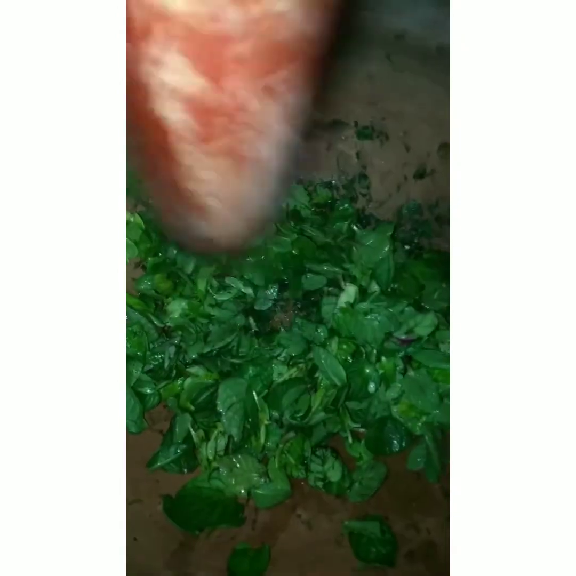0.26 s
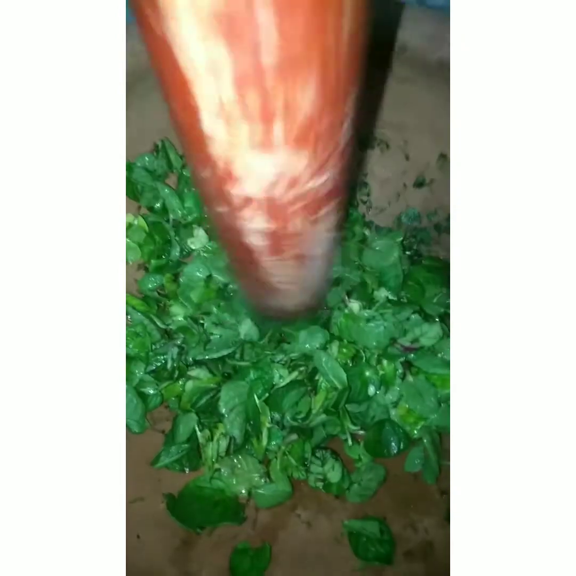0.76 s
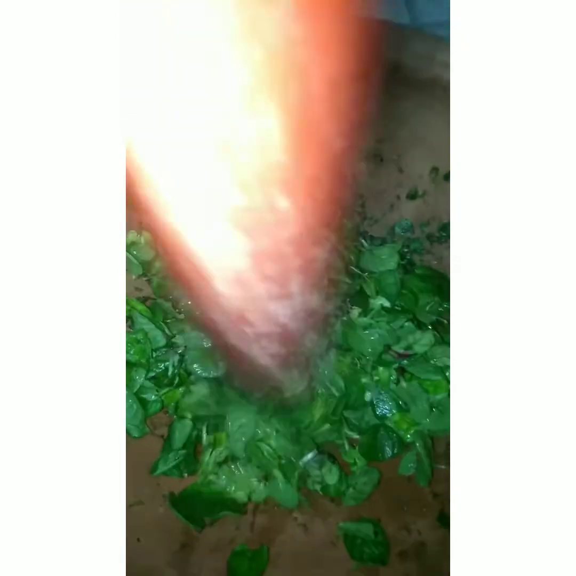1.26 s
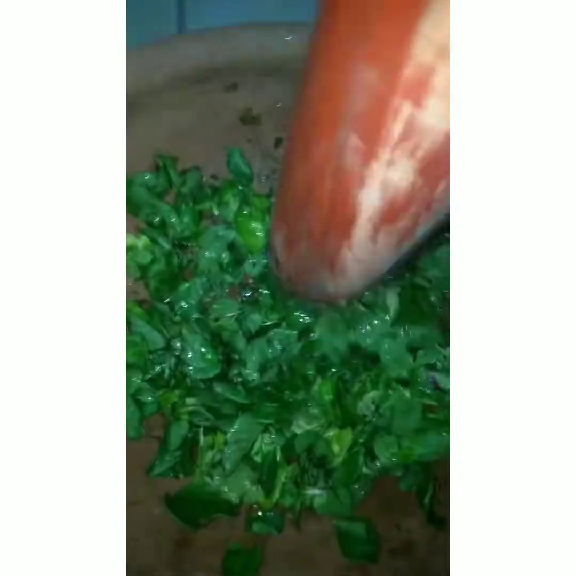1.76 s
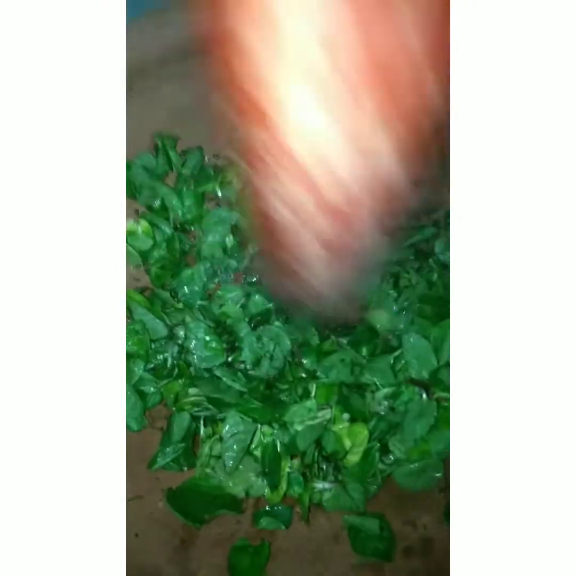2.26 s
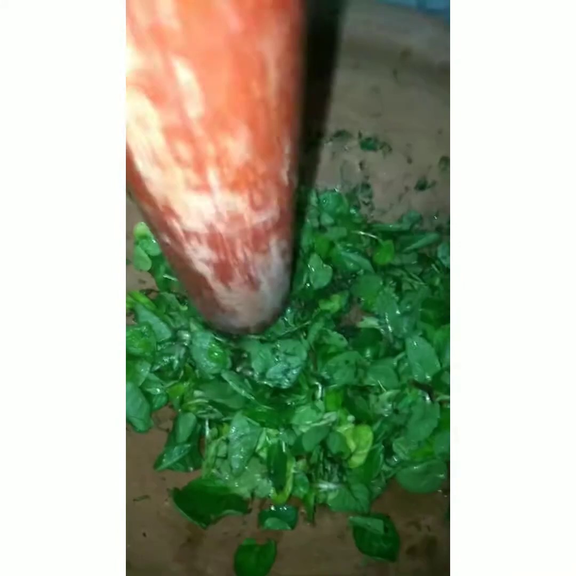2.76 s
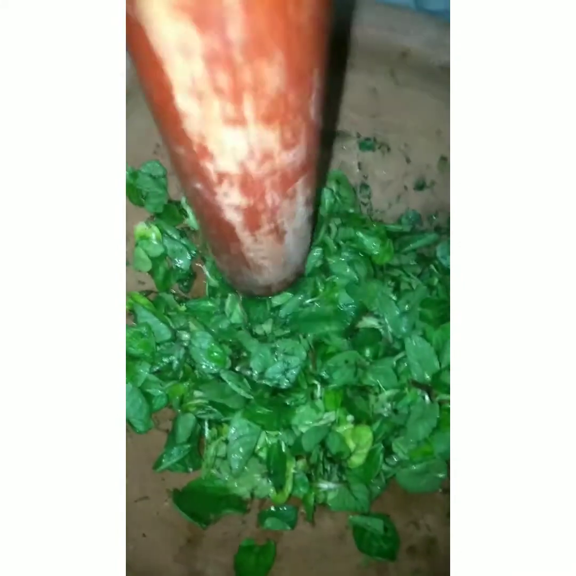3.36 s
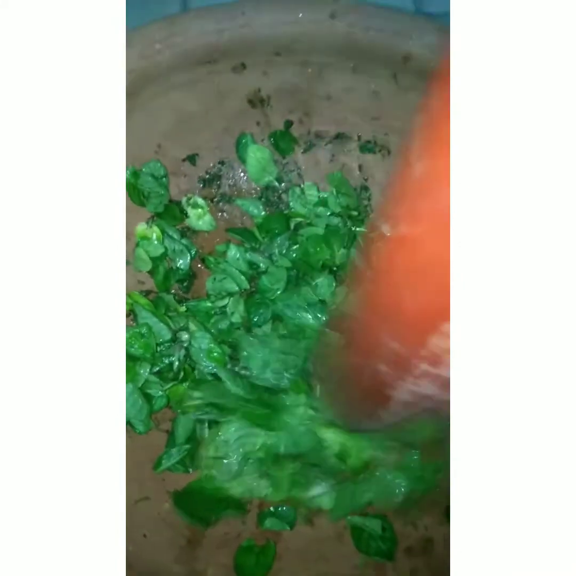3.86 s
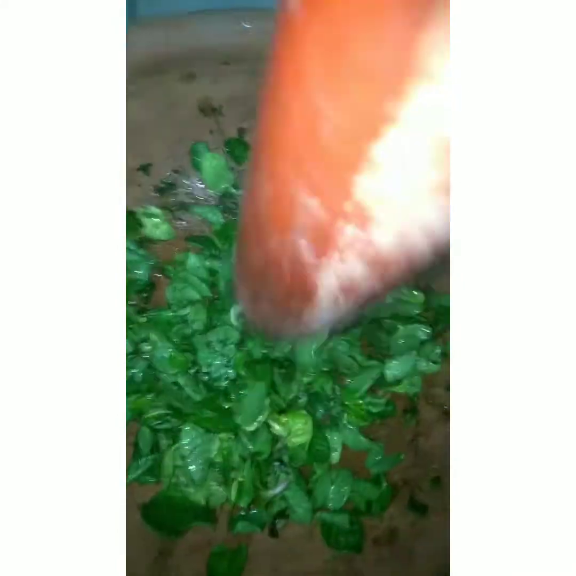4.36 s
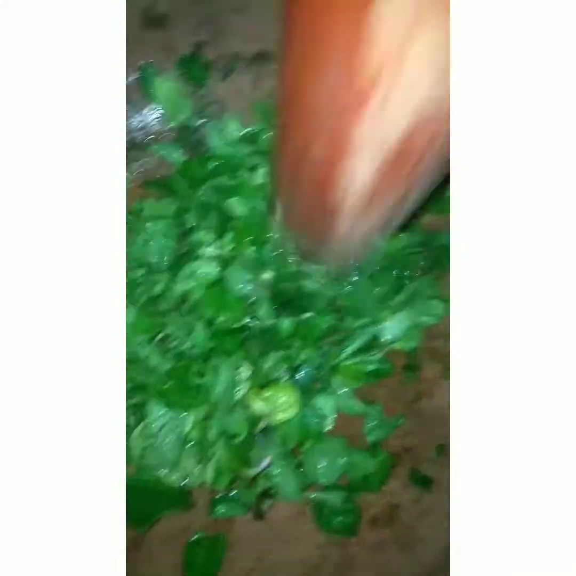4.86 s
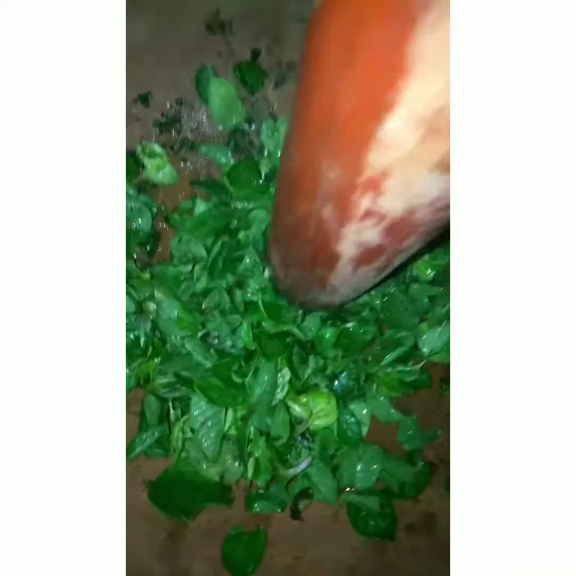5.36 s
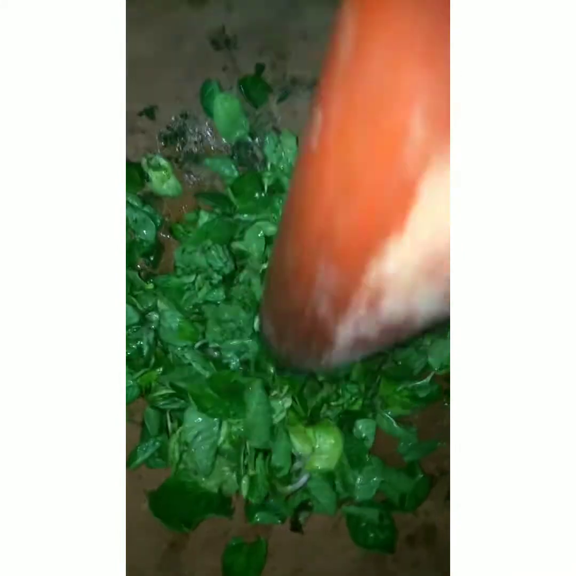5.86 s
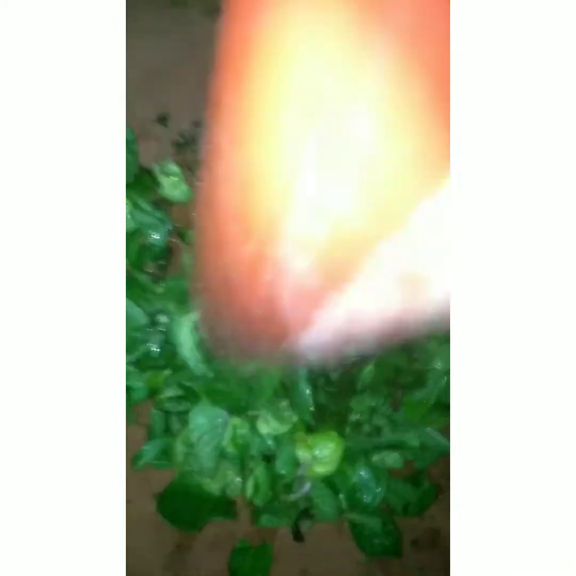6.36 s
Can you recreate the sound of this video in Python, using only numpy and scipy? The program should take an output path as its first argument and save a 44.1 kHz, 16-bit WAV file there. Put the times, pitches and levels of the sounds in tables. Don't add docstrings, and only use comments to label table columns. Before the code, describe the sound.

Steady pounding, over three strokes a second, of wood on leaves in a clay bowl: dull clonks, wet crackles, brief kitchen echo.

```python
import sys
import numpy as np
from scipy import signal
from scipy.fft import rfft, irfft, next_fast_len
from scipy.io import wavfile
from scipy.ndimage import uniform_filter1d

SR = 44100
rng = np.random.default_rng(int(sys.argv[2]) if len(sys.argv) > 2 else 0)


def persist_wave(psi):
    counts = np.round(np.clip(psi, -1, 1) * 32767).astype(np.int16)
    wavfile.write(sys.argv[1], SR, np.atleast_2d(counts).T)


def linear_from_db(decibels):
    return 10 ** (np.asarray(decibels, float) / 20)


N = 291501

# (time [s], bowl level [dB], floor thud level [dB], pestle level [dB], rim level [dB])
STRIKES = [(0.086, -13, -35, -26.5, -33), (0.372, -38.5, -37, -38, -44), (0.665, -30, -32, -39.5, -43),
           (0.968, -26.5, -33, -43, -40.5), (1.255, -39.5, -34, -39.5, -37.5),
           (1.545, -29, -33, -47, -38.5), (1.84, -30, -34, -31.5, -32.5), (2.132, -14, -36.5, -23.5, -32.5),
           (2.42, -17.5, -31, -27.5, -40), (2.721, -29.5, -32.5, -39.5, -48.5),
           (3.013, -14.5, -28.5, -66, -41), (3.292, -21.5, -30.5, -61, -33.5),
           (3.326, -20.5, -30, -55, -54), (3.595, -32, -36, -30, -38), (3.879, -14.5, -33.5, -39, -25),
           (4.169, -23.5, -32, -44, -28), (4.439, -34.5, -36.5, -41.5, -48), (4.728, -17, -35, -35.5, -47),
           (5.014, -14, -32, -32.5, -26.5), (5.297, -34.5, -35, -38, -43), (5.581, -25.5, -32.5, -40, -49),
           (5.869, -17, -34, -25.5, -23.5), (6.153, -12, -36.5, -29, -32.5), (6.44, -13, -37.5, -30.5, -31)]
# (time [s], crunch level [dB], coarse part level [dB],
# crackle afterwards level [dB], heap settling level [dB])
CRUSHES = [(0.0831, -18.5, -12, -48.5, -92), (0.3699, -24, -38.5, -56, -57.5), (0.6675, -20, -27, -42, -59),
           (0.9699, -17.5, -25, -40, -53.5), (1.2579, -23.5, -34, -51, -53), (1.5452, -21, -34, -40, -66.5),
           (1.8388, -19.5, -28, -39, -56), (2.1272, -20, -33, -47, -86), (2.4167, -21, -26.5, -48, -64),
           (2.7189, -23, -22.5, -51, -63), (3.0088, -18, -40.5, -41, -57), (3.2895, -21.5, -31, -37, -56.5),
           (3.5925, -20.5, -35, -44, -56), (3.877, -19, -14.5, -44, -66.5), (4.1673, -26.5, -23, -52, -63),
           (4.44, -27.5, -33, -55.5, -64), (4.7247, -20.5, -14.5, -38.5, -50.5),
           (5.013, -21, -10.5, -46, -63), (5.2963, -22.5, -37.5, -46, -62), (5.5784, -24, -30, -48, -52),
           (5.8681, -20, -22, -41.5, -68), (6.1516, -24.5, -25, -53, -74), (6.436, -26, -42, -53, -66)]
# (frequency [Hz], density [dB per Hz])
LEAF_SPECTRUM = [(1650, 0.5), (2800, 0.5), (3760, -6.5), (4210, -4), (5520, -10.5), (7750, 1.5),
                 (9720, -10.5), (11400, -10), (13400, -13), (15200, 1), (16200, -29), (16600, -61),
                 (17000, -67)]
# (frequency [Hz], density [dB per Hz])
SCRAPE_SPECTRUM = [(300, 3), (600, 7.5), (800, 18), (1300, 11), (2000, 7), (2500, -1.5), (3500, -35),
                   (5000, -20)]


def colour(x, points):
    size = next_fast_len(len(x))
    hz, db = np.transpose(points)
    log_hz = np.log(np.fft.rfftfreq(size, 1 / SR) + 1)
    gain = linear_from_db(np.interp(log_hz, np.log(hz), db, left=-90, right=-90))
    gain = gain / np.sqrt(np.mean(gain ** 2))
    return irfft(rfft(x, size) * gain, size)[:len(x)]


def add(out, s, x):
    i = int(s * SR)
    out[i:i + len(x)] += x[:len(out) - i]


def walk(rate):
    hold = int(SR / rate)
    steps = np.repeat(rng.standard_normal(N // hold + 1), hold)
    return 1.2 * uniform_filter1d(steps, hold)[:N]


def ring(modes, chance, swell_ms, detune=.005, scatter_db=2.0):
    t = np.arange(SR // 2) / SR
    hz, db, t60 = np.array(modes, float).T[:, :, None]
    count = len(hz)
    hz = hz * (1 + detune * chance[0, :count, None])
    gain = linear_from_db(db + scatter_db * chance[1, :count, None])
    decay = np.exp(-np.log(1000) * t / t60)
    waves = gain * decay * np.sin(2 * np.pi * hz * t)
    swell = (1 - np.exp(-t * 1000 / swell_ms)) ** 2
    return waves.sum(axis=0) * swell


def grains(per_s, spread_db):
    when, sign, size = rng.random((3, N))
    size_db = np.minimum(-spread_db * np.log(1 - size), 24)
    x = (when < per_s / SR) * np.sign(sign - .5) * linear_from_db(size_db)
    x = x / x.std() + .8 * rng.standard_normal(N)
    return x / x.std()


def clink():
    # (frequency [Hz], level [dB], t60 [s])
    dish = [(1070, -60.5, 0.31), (1160, -62, .2), (1690, -55, 0.19)]
    return ring(dish, np.zeros((2, 3)), swell_ms=0.088)


def air(loud):
    # (frequency [Hz], density [dB per Hz])
    hum_spectrum = [(12, -29), (20, 10.5), (70, 5.5), (237, 10.5), (401, -11), (561, 0.5), (677, -9),
                    (752, -46), (1170, -11), (2010, -20), (3000, -94), (3900, -63), (6600, -120)]
    keep = np.exp(-1 / (.25 * SR))
    recent = signal.lfilter([1 - keep], [1, -keep], loud ** 2)
    duck = 1 / (1 + recent / linear_from_db(-78.0)) ** 0.21
    wander = linear_from_db(3 * walk(5))
    return linear_from_db(-59.0) * wander * duck * colour(rng.standard_normal(N), hum_spectrum)


def stirring():
    # (start [s], build-up [s], hold [s], fine level [dB], coarse level [dB])
    drags = [(0.029, 0.016, 0.0068, -60.5, -53), (0.782, 0.11, 0.065, -64.5, -65.5),
             (1.165, 0.036, 0.046, -63, -61.5), (1.318, 0.034, 0.25, -61, -66),
             (1.752, 0.021, 0.072, -54.5, -51.5), (1.88, 0.081, 0.058, -64, -62),
             (2.8, 0.085, 0.12, -72, -72), (3.123, 0.071, 0.09, -69, -72), (3.34, 0.055, 0.024, -68, -83),
             (4.516, 0.094, 0.088, -59.5, -61), (5.09, 0.12, .06, -68.5, -69),
             (5.495, .08, 0.0089, -59, -62), (5.614, 0.072, 0.039, -58, -59.5),
             (6.047, 0.097, .01, -64, -64), (6.197, 0.042, 0.14, -71, -60), (6.514, 0.079, 0.054, -75, -81)]
    rest_db, rest_coarse_db = -76, -75.5
    settle_db_s, rock_db_s, stop_db_s = 107, 67, 112
    fine, coarse = np.full(N, linear_from_db(2 * rest_db)), np.full(N, linear_from_db(2 * rest_coarse_db))
    t = np.arange(SR // 2) / SR
    for s, *_, db in CRUSHES:
        settling = linear_from_db(2 * (db - settle_db_s * t))
        add(fine, s, settling)
        add(coarse, s, linear_from_db(2 * -12.5) * settling)
    for s, db, *_ in STRIKES:
        add(coarse, s, linear_from_db(2 * (db - 43 - rock_db_s * t)))
    for s, rise, hold, fine_db, coarse_db in drags:
        build = np.minimum(t / rise, 1) ** 2.1
        shape = build * linear_from_db(-2 * stop_db_s * np.maximum(t - rise - hold, 0))
        add(fine, s, linear_from_db(2 * fine_db) * shape)
        add(coarse, s, linear_from_db(2 * coarse_db) * shape)
    return np.sqrt(fine), np.sqrt(coarse)


def rustle():
    fine, coarse = stirring()
    bright = (fine / linear_from_db(-65.5)) ** 0.15
    fine = colour(fine * linear_from_db(1.5 * walk(40)) * grains(4000, 2.5), LEAF_SPECTRUM)
    top = signal.sosfiltfilt(signal.butter(2, 10500., "high", fs=SR, output="sos"), fine)
    low = signal.sosfiltfilt(signal.butter(2, 5500., "low", fs=SR, output="sos"), fine)
    top_gain = bright * linear_from_db(2 * walk(15) + 2 * walk(4))
    low_gain = linear_from_db(2 * walk(15))
    fine += top * (top_gain - 1) + low * (low_gain - 1)
    coarse = coarse * linear_from_db(1.5 * walk(25)) * grains(3000, 2.5)
    return fine + colour(coarse, SCRAPE_SPECTRUM)


def crush():
    # (frequency [Hz], density [dB per Hz])
    snap_spectrum = [(1650, -1.5), (2800, 4), (5400, -8), (8300, 2), (10100, -13), (12700, -8.5),
                     (14900, -4), (16100, -10), (17000, -57)]
    # (time [s], level [dB])
    stems = [
        (0.337, -50),
        (2.108, -49),
        (2.377, -60),
        (3.3444, -44),
        (4.207, -46.5),
        (5.5994, -50),
        (6.478, -46),
    ]
    snap, fine, coarse, jolt = np.zeros((4, N))
    t = np.arange(SR // 10) / SR * 1000 - 30
    late = t - 3.0
    for s, db, coarse_db, after_db, _ in CRUSHES:
        bowl_db = min(STRIKES, key=lambda strike: abs(strike[0] - s))[1]
        rise_ms = 1.1 - 0.16 * bowl_db
        burst = np.exp(np.where(late < 0, -(late / (.7 * rise_ms)) ** 2, -late / 1.2))
        enter = linear_from_db(-19) * (late < 0) * np.exp(np.minimum(late, 0) / 7)
        after = (late > 0) * np.exp(-(late / 22.4) ** 4)
        add(snap, s - .03, linear_from_db(db - 11.0) * burst)
        add(fine, s - .03, linear_from_db(db - 7.0) * enter + linear_from_db(after_db - 7.5) * after)
        add(coarse, s - .03, linear_from_db(coarse_db - 12.0) * (burst + enter))
        shove = np.exp(-((late - 3.0) / 3.15) ** 2)
        add(jolt, s - .03, linear_from_db(-33.5 + 0.24 * bowl_db) * shove)
    for s, db in stems:
        add(snap, s - .03, linear_from_db(db - 9.5) * np.exp(-((t - 1.5) / 1.0) ** 2))
    jolt = signal.sosfilt(signal.butter(1, 22., "high", fs=SR, output="sos"), jolt)
    crackle = colour(snap * grains(12000, 2.3), snap_spectrum)
    crackle += colour(fine * grains(4000, 0.95), LEAF_SPECTRUM)
    return crackle + colour(coarse * grains(5000, 5.3), SCRAPE_SPECTRUM), jolt


def wall(low_hz, high_hz, db, t60):
    t = np.arange(SR // 2) / SR
    sos = signal.butter(2, [low_hz, high_hz], "band", fs=SR, output="sos")
    band = signal.sosfilt(sos, rng.standard_normal(len(t)))
    decay = np.exp(-np.log(1000) * t / t60)
    return linear_from_db(db) * band / band.std() * decay * np.minimum(t / .012, 1)


def room(x):
    # (centre [Hz], t60 [s], level [dB])
    octaves = [(137.3, 0.51, 0.5), (333, 0.55, -1), (522, 0.45, -2), (1067, 0.45, -6), (2350, 0.39, -12.5),
               (4680, 0.58, -16.5), (9900, 0.075, -64)]
    t = np.arange(SR // 2) / SR
    tail, noise = 0, rng.standard_normal(len(t))
    for hz, t60, db in octaves:
        sos = signal.butter(2, [hz / np.sqrt(2), hz * np.sqrt(2)], "band", fs=SR, output="sos")
        band = signal.sosfilt(sos, noise)
        build = np.clip((t - .004) / 0.0089, 0, 1)
        fade = np.exp(-np.log(1000) * t / t60) * build
        tail = tail + linear_from_db(db) * band * fade / np.sqrt(np.sum(fade ** 2))
    return signal.fftconvolve(x, tail)


def blows():
    # (frequency [Hz], level [dB], t60 [s])
    bowl = [(800, 3, .012), (754, -2, .1), (770, -18, .32), (842, -11, .08), (1100, 0, .014),
            (1400, 1, .012)]
    floor = [(150, -8, .12), (173, -4, .15), (210, -6, .1), (250, 0, .12), (316, -4, .1), (360, -6, .08)]
    belly = [(409, -2, .06), (460, -4, .05), (497, -1, .06), (540, -2, .05), (614, 0, .06), (670, -4, .05)]
    pestle = [(1869, -13.5, 0.23), (1947, -7.5, .1), (2002, 7.5, 0.049), (2122, -13, .12),
              (2102, -7.5, 0.043), (2200, -4, 0.055)]
    rim = [(2433, 0, .07), (2410, -20, .25), (2900, -5, .015), (3340, -9, .012)]
    # (low edge [Hz], high edge [Hz], level [dB], t60 [s])
    clay_wall = (1894, 2078, -19.5, 0.6)
    clay_bottom = (731, 837, -26, 0.2547)
    out = np.zeros(N)
    chance = rng.standard_normal((len(STRIKES), 5, 2, 6))
    for (s, db, floor_db, pestle_db, rim_db), c in zip(STRIKES, chance):
        belly_db = 15 + 0.57 * db + 0.93 * floor_db
        x = linear_from_db(db - 4.0) * ring(bowl, c[0], swell_ms=1.0)
        x += linear_from_db(floor_db + 3.0) * ring(floor, c[1], swell_ms=5.26, detune=0.027)
        x += linear_from_db(belly_db - 1.5) * ring(belly, c[2], swell_ms=2.2, detune=0.074)
        x += linear_from_db(pestle_db - 3.5) * ring(pestle, c[3], swell_ms=0.36)
        x -= linear_from_db(rim_db - 2.0) * ring(rim, c[4], swell_ms=0.38)
        wet = room(x)
        wet[:len(x)] += x + linear_from_db(pestle_db) * wall(*clay_wall) + linear_from_db(db) * wall(*clay_bottom)
        add(out, s - .0003, wet)
    return out


def taps():
    # (time [s], level [dB])
    finger = [
        (6.3673, -27),
        (6.382, -34.5),
        (6.396, -45),
    ]
    out, t = np.zeros(N), np.arange(SR // 50) / SR * 1000
    push = np.exp(-((t - 1.8) / 0.65) ** 2)
    push -= 0.77 * np.exp(-((t - 4.3) / 1.6) ** 2)
    tick = uniform_filter1d(rng.standard_normal(len(t)), size=2)
    push += linear_from_db(-19.5) * tick * np.exp(-((t - 2.2) / 0.88) ** 2)
    for s, db in finger:
        add(out, s - .001, linear_from_db(db) * push)
    return out


def scene():
    # (frequency [Hz], level [dB])
    width = [(3100, -34), (3900, -12), (5200, 10), (6300, -1.5), (7600, -18), (9000, -1.5), (10500, 8),
             (13000, 5), (14500, -2), (16500, -9)]
    crunch, jolt = crush()
    strikes = blows()
    mid = strikes + crunch + room(crunch)[:N] + jolt + rustle() + taps() + air(strikes)
    add(mid, 0, clink())
    side = linear_from_db(-15.0) * colour(mid, width)
    side = colour(side * np.sign(walk(300)), [(3300, -39), (3700, -6.0), (16000, 0.5), (16400, -40)])
    return np.array([mid + side, mid - side])


def band_limit(x):
    return signal.sosfilt(signal.butter(12, 17140, fs=SR, output="sos"), x)


def record(dry):
    mix = 0.54 * np.tanh(dry / 0.31)
    return band_limit(mix)


dry = scene()
out = record(dry)
persist_wave(out)
```